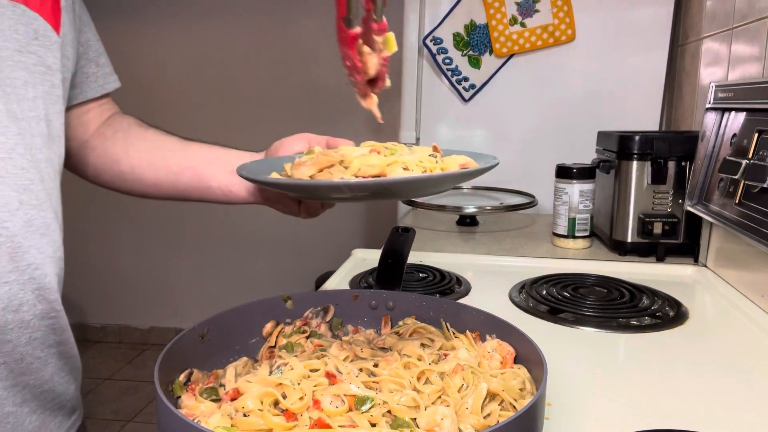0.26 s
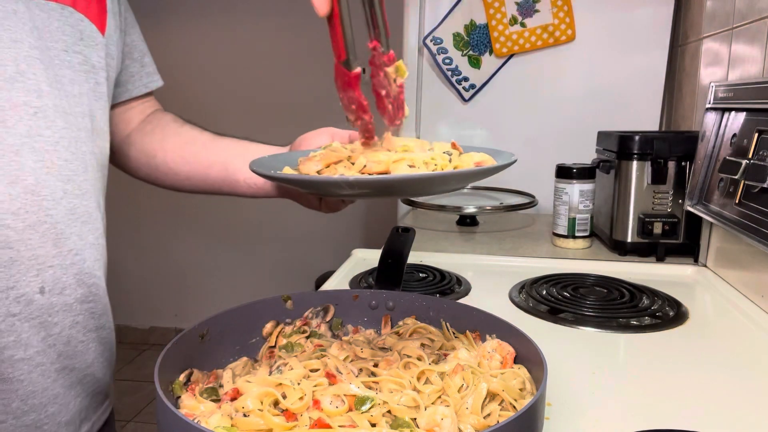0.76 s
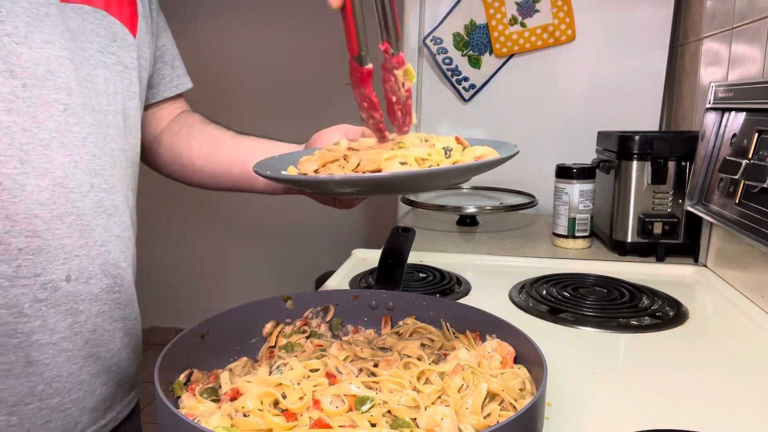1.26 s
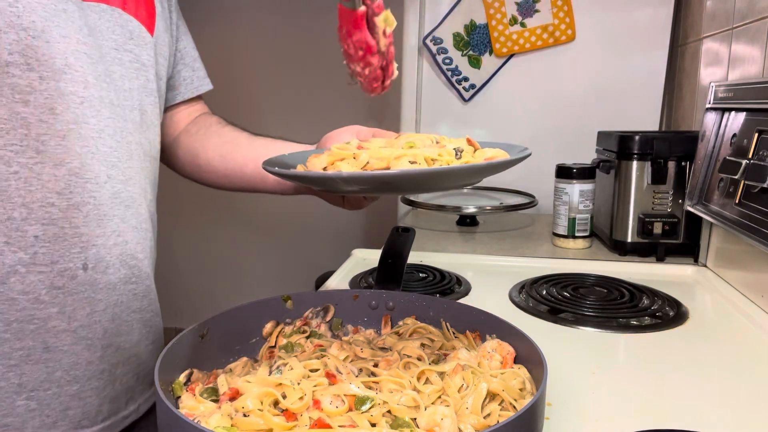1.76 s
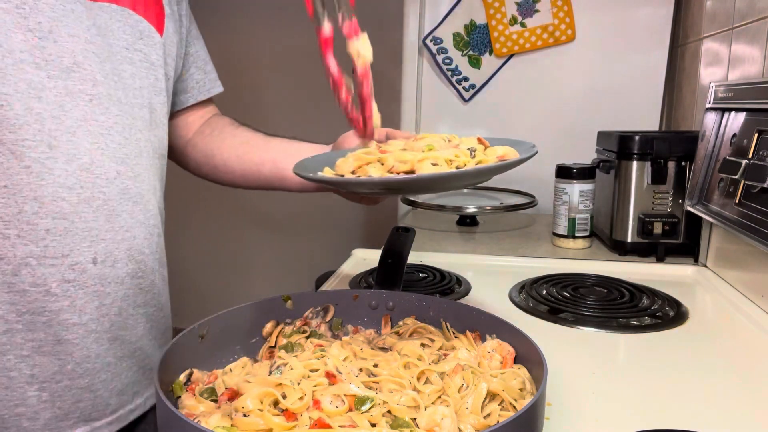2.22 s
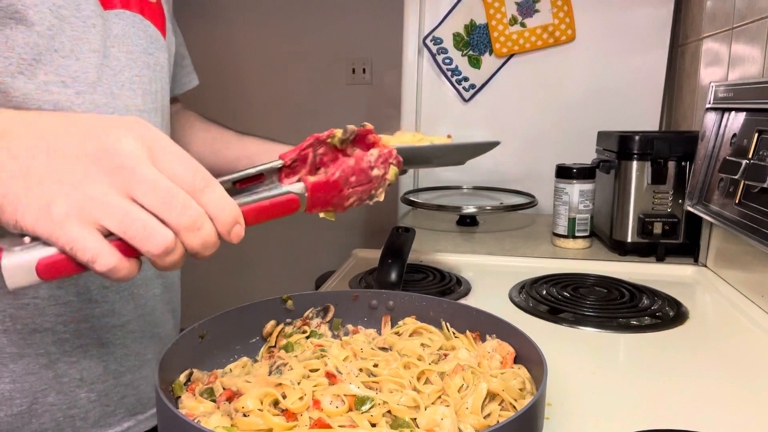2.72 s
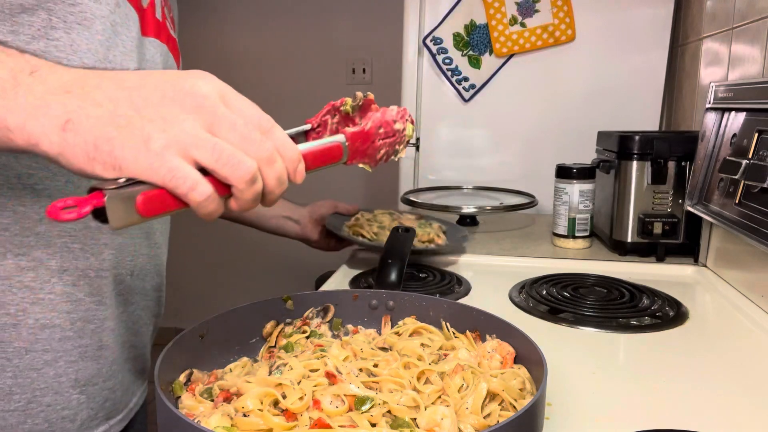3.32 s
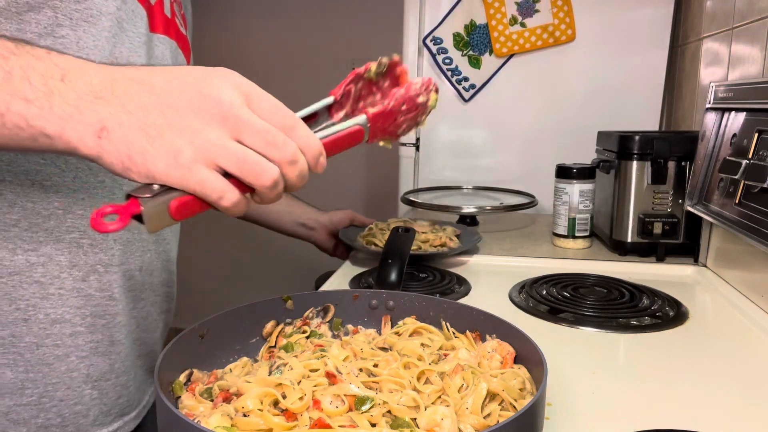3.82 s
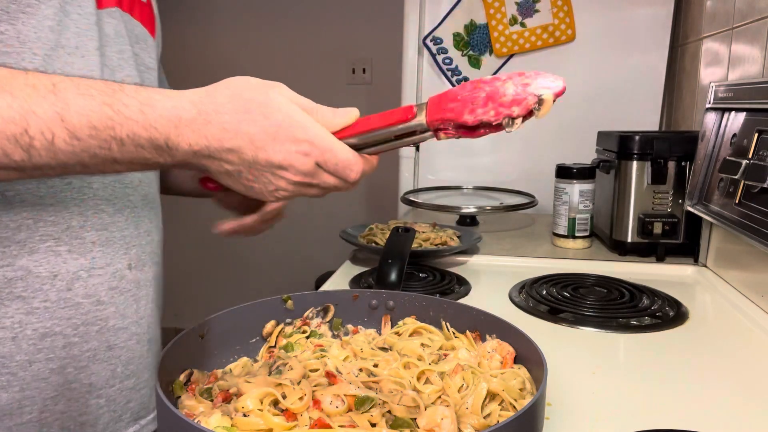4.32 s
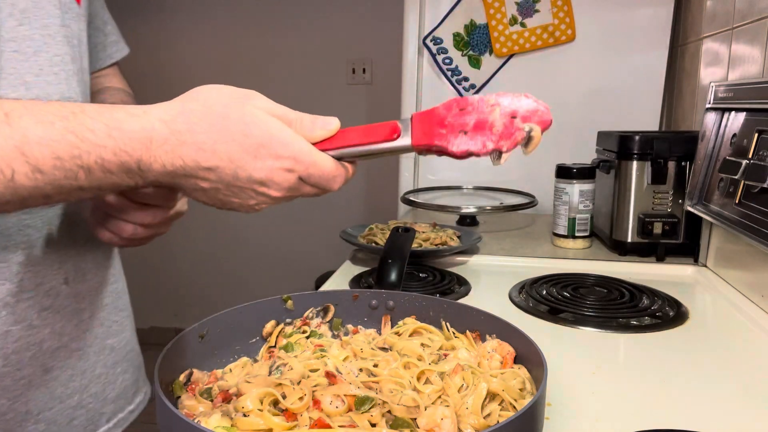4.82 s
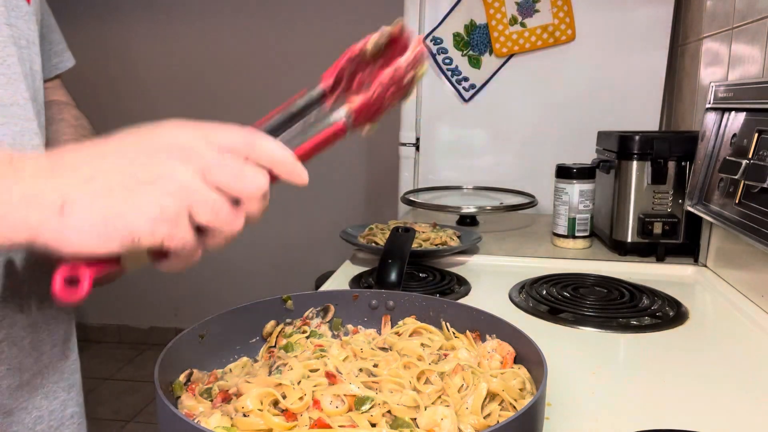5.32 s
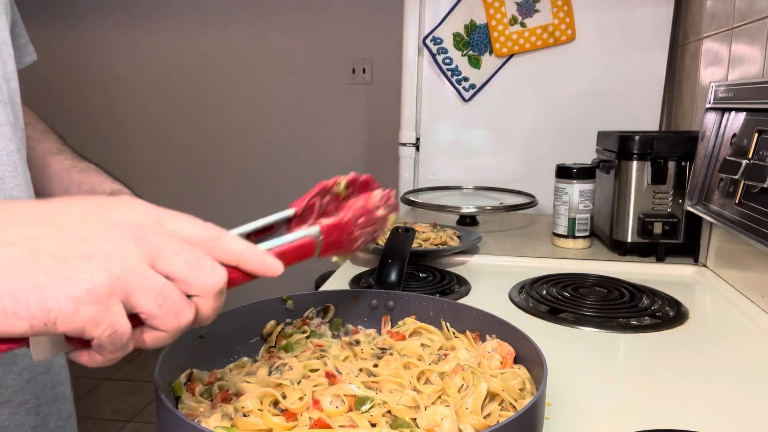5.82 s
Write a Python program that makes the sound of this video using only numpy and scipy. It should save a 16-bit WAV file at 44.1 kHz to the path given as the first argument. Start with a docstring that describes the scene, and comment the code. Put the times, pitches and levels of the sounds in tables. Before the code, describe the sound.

A quiet home kitchen with low, bass-heavy room tone and faint sauce pops. Tiny pasta ticks come first, then one crisp clack of steel tongs at two seconds. Past three seconds a full plate is set on the enamel stove top in three solid, rattling knocks, the loudest sounds here. Light tong clacks and thin, bright ticks continue to the end. Close stereo pickup in a small hard room.

```python
"""A quiet home kitchen. Low room tone (banded noise) runs throughout under faint sauce pops (short pings)
and small ticks of pasta and of tongs (bursts of a few cycles with a noisy snap). From two seconds in, steel
tongs clack lightly in the hand. Past three seconds a full plate is set down on the enamel stove top in
three knocks, rocking after the first and last. Short dull noise swells surround the onsets of the knocks
and first clack. Blows ring body modes and noise echoes of a small hard room; clacks and ticks carry on."""
import sys
import numpy as np
from scipy import signal
from scipy.fft import rfft, irfft
from scipy.io import wavfile

SR = 44100
rng = np.random.default_rng(int(sys.argv[2]) if len(sys.argv) > 2 else 0)


def generate_wav(signal):
    """Clip the signal to [-1, 1] and save it as 16-bit WAV at the path in sys.argv[1]."""
    frames = np.transpose(np.atleast_2d(signal))
    scaled = np.clip(frames, -1, 1) * 32767
    pcm = np.round(scaled).astype(np.int16)
    wavfile.write(sys.argv[1], SR, pcm)


N = 267687   # length [samples]


def amp(db):
    """Decibels to gain."""
    return 10 ** (np.asarray(db) / 20)


def rms_one(x):
    """Scale to unit RMS level."""
    return x / np.sqrt(np.mean(x ** 2) + 1e-20)


def at_hz(points, hz):
    """Read a curve of (frequency, value) points on a log-frequency axis."""
    curve_hz, values = np.array(points)[:, :2].T
    return np.interp(np.log(hz), np.log(curve_hz), values)


def train(times, sizes):
    """Clicks of the given sizes at the given times."""
    out = np.full(N, 1e-18)   # tiny offset keeps the filters away from denormal numbers
    np.add.at(out, (np.array(times) * SR).astype(int), sizes)
    return out


def drift(rate):
    """Slow random wandering of spread 1: noise through two equal low-passes at rate [Hz]."""
    step = 40   # computed once per 40 samples
    r = np.exp(-2 * np.pi * rate * step / SR)
    noise = rng.standard_normal(N // step + 2002)
    slow = signal.lfilter([1], [1, -2 * r, r * r], noise)[2000:]   # drop the run-in
    return np.interp(np.arange(N) / step, np.arange(len(slow)), rms_one(slow))


def ring(clicks, hz, t60):
    """Two-pole resonator: a unit click sets a sine of height 1 ringing, down 60 dB after t60 [s]."""
    r, w = amp(-60 / (t60 * SR)), 2 * np.pi * hz / SR
    return signal.lfilter([0, np.sin(w)], [1, -2 * r * np.cos(w), r * r], clicks)


EDGES = 22 * 2 ** np.arange(0, 9.8, .45)   # band edges [Hz], 0.45 octave apart


def bands():
    """Each band of the filter bank: its centre [Hz] and its band-pass."""
    for low, high in zip(EDGES, EDGES[1:]):
        yield np.sqrt(low * high), signal.butter(2, [low, high], "band", fs=SR, output="sos")


# spectrum of the room tone's mid: (frequency [Hz], relative level per Hz [dB])
TONE_MID_SPECTRUM = [(20, -20), (36, -4), (60, 0), (130, -6.5), (205, -12.5), (255, -20), (440, -13.5),
                     (560, -22), (720, -17.5), (985, -27.5), (2500, -30.5), (5200, -34), (9000, -37),
                     (16000, -36.5)]
# stereo width of the room tone: (frequency [Hz], side minus mid [dB])
TONE_WIDTH = [(60, -16.5), (150, -9.5), (380, -3.5), (950, -5), (2380, -5), (5980, -2.5), (15000, 9)]
# swells of the treble hiss: (time [s], level relative to the room tone [dB])
HISS_SWELLS = [(0.0, 1), (.51, 3), (.64, 8.5), (.85, 3.5), (1.23, 7), (1.35, 3), (1.47, 6.5), (1.64, 1.5),
               (2.08, 3.5), (2.209, -3.5), (2.41, 2.5), (3.291, 1.5), (4.44, 4), (5.339, 6.5), (6.06, 5.5)]
TONE_DB, RUMBLE_WANDER_DB = -36, .5


def room_tone(patchy_db):
    """Mid and side noise shaped band by band; bass rumble and treble hiss swell on their own."""
    swell_s, swell_db = np.transpose(HISS_SWELLS)
    white, out = rng.standard_normal((2, 2, N)), np.zeros((2, N))
    together = drift(30)   # flutter shared by the upper bands
    rumble_db = RUMBLE_WANDER_DB * drift(3.0)
    hiss_db = np.interp(np.arange(N) / SR, swell_s, swell_db)
    for k, (hz, sos) in enumerate(bands()):
        high = np.clip(np.log2(hz / 250) / 5.5, 0, 1)   # 0 = all rumble, 1 = all hiss
        swells_db = (1 - high) * rumble_db + high * hiss_db
        flutter_db = patchy_db * (high * together + 2.4 * drift(17))
        gain = amp(TONE_DB + at_hz(TONE_MID_SPECTRUM, hz) + swells_db + flutter_db)
        width = amp([[0], [at_hz(TONE_WIDTH, min(hz, 6000))]])
        out += gain * width * signal.sosfilt(sos, white[k % 2])
    return out


def crackle(per_s, level_db):
    """Faint sauce pops: random clicks in clumps, each pinging one of 8 pitches from its own direction."""
    born = rng.random(N) < per_s * amp(4.0 * drift(12)) / SR
    strength = amp(2.7 * np.minimum(rng.exponential(1, N), 3))
    pops = strength * born * (2 * rng.random((2, N)) - 1)   # random shares of mid and side
    pitches, dealt = np.geomspace(1500, 13000, 8), rng.integers(0, 8, N)
    out = np.zeros((2, N))
    for k, hz in enumerate(pitches):
        out += ring(pops * (dealt == k) + 1e-18, hz, 21.0 / hz)
    return amp(level_db) * out


# small ticks, of pasta and of the tongs: (time [s], level [dB], centre frequency [Hz],
# left minus right [dB], broad snap relative to the tick [dB])
SMALL_TICKS = [(0.0997, -50.5, 5240, -10, -19), (0.3059, -45.5, 5600, -12, -8),
               (0.447, -50.5, 2800, -6, 6.5), (0.745, -44.5, 5200, -9, -23), (0.8739, -45, 5240, -14, -14),
               (0.926, -39, 6340, -6, -18), (1.2266, -47, 2700, -6, 0), (1.4, -46, 5950, -14, -15),
               (1.455, -48, 6200, 8, 5), (1.854, -38, 12900, 4, -16), (2.43, -60.5, 4170, -10, 12.5),
               (2.479, -54, 3000, -5, 3), (2.52, -45.5, 5200, -10, -13), (2.943, -51, 4300, -10, -2),
               (3.288, -43, 5600, 1, -11), (3.819, -42, 5830, -8, -6), (4.325, -45.5, 3600, -2.5, -10),
               (4.355, -49, 4930, -10, 3), (4.6509, -47, 4960, -14, 2), (4.6544, -35, 2500, -17, -9),
               (4.766, -43, 5170, -3, -22), (4.797, -47, 5330, -12, -19), (5.1907, -35, 6020, -2, -8),
               (5.2607, -44, 5600, 1.5, -11), (5.2759, -36, 11300, -11, -23),
               (5.436, -23, 12500, -8.5, -19), (5.474, -30.5, 12000, 4, -11),
               (5.5236, -30.5, 12460, -8, -15), (5.5456, -50, 2400, -7.5, -18.5)]
SNAP_T60_S = .005


def ticks(cycles, tail_db, tail_s):
    """Each tick rings for a few cycles with a broad snap on top and a short grainy tail at its pitch."""
    out, t = np.zeros((2, N)), np.arange(SR // 16) / SR
    for s, level_db, hz, pan_db, snap_db in SMALL_TICKS:
        grain, phase = rng.standard_normal((2, 2, len(t))), t * hz / cycles
        snap_noise = amp(snap_db - 60 * t / SNAP_T60_S) * grain[0]
        snap = np.diff(snap_noise, prepend=0)   # differencing brightens the noise
        tail = ring(grain[1] * amp(-60 * t / tail_s), hz, 5.8 / hz)
        tail = amp(tail_db) * tail * np.sqrt(hz / SR)
        ping = np.sin(2 * np.pi * hz * t) * (1 - np.exp(-15 * phase)) * amp(-50 * phase)
        pan = np.array([[.5], [-.5]]) * pan_db
        out[:, round(s * SR):][:, :len(t)] += amp(level_db + pan) * (ping + snap + tail)
    left, right = out
    return np.array([left + right, left - right]) / 2


# dull noise swells around the onsets of the knocks and first clack: (start [s], end [s], final level [dB])
ONSET_SWELLS = [(2.079, 2.092, -58), (3.339, 3.358, -35.5), (3.653, 3.665, -34), (3.85, 3.868, -31)]
SWELL_RISE_DB, SWELL_HZ, SWELL_T60_S = 12, 2080, 0.0044


def onset_noise():
    """Noise through one heavily damped resonance near 2 kHz, rising through each swell, then cut off."""
    t, shape = np.arange(N) / SR, np.zeros(N)
    for start, end, level_db in ONSET_SWELLS:
        to_go = (end - t).clip(0, 1) / (end - start)
        shape += amp(level_db - SWELL_RISE_DB * to_go) * (t > start) * (t < end)
    return shape * rms_one(ring(rng.standard_normal((2, N)), SWELL_HZ, SWELL_T60_S))


BOOM_OCTAVES = 0.84   # half-width of the boom, to 1/e of its dB


def colour(body, hz):
    """Size of every blow at one frequency: body spectrum, a boom band, and brightness about a pivot."""
    rows, spectrum, boom_hz, pivot_hz, tilt_from_hz = body
    _, level_db, boom_db, slope_db, *_ = np.transpose(rows)
    boom = np.exp(-(np.log2(hz / boom_hz) / BOOM_OCTAVES) ** 2)
    octaves = min(np.log2(max(hz, tilt_from_hz) / pivot_hz), 3.0)   # the tilt goes flat at both ends
    return amp(at_hz(spectrum, hz) + level_db + boom_db * boom + slope_db * octaves)


# how long the room rings: (frequency [Hz], decay by 60 dB [s])
ROOM_DECAY = [(60, 0.98), (95, 0.32), (160, 0.97), (420, 0.68), (1100, 0.43), (2900, 0.41), (7700, 0.4),
              (14000, 0.44)]
# stereo width of the echoes: (frequency [Hz], side minus mid [dB])
ROOM_WIDTH = [(60, -15), (150, -12), (380, -2.5), (950, 0.5), (2380, -2), (5980, -2), (15000, -4.5)]


def room_answer(body, rattle_db, rattle_s, echo_db, build_s, build_cycles):
    """A short rattle and dense echoes: noise that builds up and dies band by band after every blow."""
    times, out = [row[0] for row in body[0]], np.zeros((2, N))
    white = rng.standard_normal((2, 2, N))
    for k, (hz, sos) in enumerate(bands()):
        clicks = train(times, colour(body, hz)) / np.sqrt(hz / SR)   # levels are per band, not per Hz
        echo_decay, rattle_decay = amp(-60 / (at_hz(ROOM_DECAY, hz) * SR)), amp(-60 / (rattle_s * SR))
        echoes = signal.lfilter([amp(echo_db)], [1, -echo_decay], clicks)
        rattle = signal.lfilter([amp(rattle_db)], [1, -rattle_decay], clicks)
        build = np.exp(-1 / ((build_s + build_cycles / hz) * SR))   # lows take longer to fill the room
        shape = signal.lfilter([1 - build], [1, -build], echoes + rattle)
        out += signal.sosfilt(sos, amp([[0], [at_hz(ROOM_WIDTH, hz)]]) * shape * white[k % 2])
    return out


def struck_modes(body, modes, spots, ring_db, swell_cycles):
    """Each natural mode swells over some cycles, then dies away, as loud as the struck spot drives it."""
    times, out = [row[0] for row in body[0]], np.zeros((2, N))
    for k, (hz, t60, *spot_db) in enumerate(modes):
        chance_db = rng.normal(0, 1.0, len(times))
        sizes = colour(body, hz) * amp(np.take(spot_db, spots) + ring_db + chance_db)
        swell = ring(train(times, sizes), hz, swell_cycles / hz)
        swell = np.diff(swell, prepend=0) / (2 * np.pi)
        side = amp(at_hz(ROOM_WIDTH, hz) - 2.0) * (-1) ** k   # neighbouring modes lean opposite ways
        out += ring(swell, hz, t60) * [[1], [side]]
    return out


CRACK_DELAY_S = .0007


def bursts(rows, parts, crack_cycles):
    """Every blow's crack at its own pitch, then the bursts that all blows on this body share."""
    out = []
    for s, level_db, _, brightness, crack_hz, crack_db in rows:
        out.append((s + CRACK_DELAY_S, crack_db, crack_hz, crack_cycles))
        for delay_s, hz, cycles, part_db, gain_db in parts:
            out.append((s + delay_s, level_db + part_db + gain_db * brightness, hz, cycles))
    return out


# first wall echoes: (delay [s], level [dB], share of the width, sign gives the side)
WALL_ECHOES = [(.0055, -14.5, 0.83), (0.01, -17.5, -0.79), (0.0163, -14.5, 0.91), (0.0209, -13.5, -1),
               (0.028, -20, 1)]


def contacts(rows, width):
    """Each contact is a burst of a few cycles; the nearest walls send it back from either side."""
    direct, t = np.zeros(N), np.arange(SR // 20) / SR
    for s, level_db, hz, cycles in rows:
        phase = hz * t / cycles   # 58 dB down when this reaches 1
        envelope = (1 - np.exp(-12 * phase)) * amp(level_db - 58 * phase)
        direct[round(s * SR):][:len(t)] += np.sin(2 * np.pi * hz * t) * envelope
    out = direct * np.array([[1], [0]])
    for lag_s, level_db, side in WALL_ECHOES:
        out += amp(level_db) * np.roll(direct, round(lag_s * SR)) * [[1], [width * side]]
    return out


def thin(x, hz):
    """Small bodies radiate no deep bass: high-pass."""
    return signal.sosfilt(signal.butter(3, hz, "high", fs=SR, output="sos"), x)


def lean(x, right):
    """A source off to the right puts some of its mid, inverted, into the side."""
    mid, side = x
    return np.array([mid, side - right * mid])


# tong arms meeting: (time [s], level [dB], boom [dB], brightness [dB per octave],
# crack frequency [Hz], crack level [dB])
CLACK_BLOWS = [(2.089, -20, -12, -1.5, 2620, -15.5), (2.1028, -33, -30, -14, 2800, -26),
               (4.2175, -29, -9, -38, 2470, -38), (4.5178, -36, -4.5, 0, 2720, -37.5),
               (4.6583, -26.5, 3, 5, 2700, -20), (4.6635, -34, -4, -4, 2250, -24),
               (5.0046, -43, -2, -0.5, 2820, -35)]
# which of the two places along the arms meets, one per clack: (column of place levels)
CLACK_PLACES = [0, 0, 0, 0, 1, 1, 0]
# spectrum of a clack: (frequency [Hz], relative level [dB])
CLACK_SPECTRUM = [(170, -46), (300, -52), (600, -15), (1300, -14.5), (2600, -10.5), (5500, -17.5),
                  (12000, -16.5)]
# bursts in every contact of the arms: (delay [s], frequency [Hz], cycles to fall 58 dB,
# level relative to the clack [dB], gain per unit of brightness [dB])
CLACK_BURSTS = [(0.00073, 11300, 4.1, -1.5, 3.5), (0.00159, 1260, 3.2, -18.5, 3.4),
                (0.0004, 1740, 6.8, -5, 0.12)]
# modes of the steel arms: (frequency [Hz], decay by 60 dB [s], then relative level at each place [dB])
TONG_MODES = [(690, 0.12, 3, -5), (1006, 0.13, -16, 2), (1045, 0.21, -16, 11), (1198, 0.12, -5, 5),
              (1810, 0.066, 1.5, -11), (1993, 0.072, 7.5, 13), (2250, 0.2, -4, 9), (2700, 0.16, 1, 0),
              (2860, 0.17, 0, 4.5), (3040, 0.22, -10, -7), (3343, 0.2, -3.5, -8), (4700, 0.17, -8, -16),
              (4760, 0.08, -8, -18), (5600, 0.11, 0.5, -16)]
CLACK_BOOM_HZ, CLACK_PIVOT_HZ, CLACK_TILT_FROM_HZ = 1190, 3070, 3060
CLACK_CRACK_CYCLES, TONGS_RIGHT = 4.2, 0.035   # TONGS_RIGHT: share of the mid leaning right


def tongs():
    """Steel arms meet: crisp contact bursts, ringing arm modes and the room's answer."""
    arms = CLACK_BLOWS, CLACK_SPECTRUM, CLACK_BOOM_HZ, CLACK_PIVOT_HZ, CLACK_TILT_FROM_HZ
    body = room_answer(arms, rattle_db=-11.5, rattle_s=0.033, echo_db=-23.5, build_s=0.00024, build_cycles=4.9)
    body += struck_modes(arms, TONG_MODES, CLACK_PLACES, ring_db=3.5, swell_cycles=0.89)
    contact = contacts(bursts(CLACK_BLOWS, CLACK_BURSTS, CLACK_CRACK_CYCLES), width=0.2)
    return lean(thin(thin(body, hz=654) + contact, hz=600), TONGS_RIGHT)


# broad resonances of the plate: (frequency [Hz], width [Hz], level [dB])
PLATE_RESONANCES = [(460, 47, -2), (1100, 430, -0.5), (2320, 120, 1.5), (3670, 23, 8), (5284, 300, 0.5)]


def resonant(x):
    """The plate lifts a few broad bands out of whatever shakes it: band-passes added to the source."""
    out = x.copy()
    for hz, width_hz, level_db in PLATE_RESONANCES:
        r = np.exp(-np.pi * width_hz / SR)
        zeros = np.array([1, 0, -1]) * (1 - r * r) / 2
        poles = [1, -2 * r * np.cos(2 * np.pi * hz / SR), r * r]
        out += amp(level_db) * signal.lfilter(zeros, poles, x)
    return out


# plate on the stove top: (time [s], level [dB], boom [dB], brightness [dB per octave],
# crack frequency [Hz], crack level [dB])
KNOCK_BLOWS = [(3.3566, -8, 6, 0.035, 2230, -3), (3.3715, -19, 10.5, -3.5, 870, -9),
               (3.380, -14.5, 6.5, -1, 1100, -12), (3.3875, -25.5, 7.5, 0, 600, -21),
               (3.397, -20, 6.5, -2, 1140, -22), (3.6622, -7.5, 6.5, -1, 1280, -1),
               (3.856, -4.5, 19.5, -5.5, 1005, -10), (3.8775, -21.5, 3, -1, 385, -11.5)]
# which of three spots of the stove top each knock lands on: (column of spot levels)
KNOCK_PLACES = [0, 0, 0, 0, 0, 1, 2, 2]
# the sheet top flexes under the plate in dull thumps: (time [s], frequency [Hz], level [dB])
SHEET_THUMPS = [(3.358, 500, -6.5), (3.385, 480, -10.5), (3.6637, 540, -10), (3.8578, 600, -1.5),
                (3.867, 470, -5.5), (3.8769, 439, -6.5), (3.9098, 420, -12)]
# spectrum of a knock: (frequency [Hz], relative level [dB])
KNOCK_SPECTRUM = [(45, -42.5), (90, -25.5), (170, -21), (300, -18.5), (600, -10), (1300, -10),
                  (2600, -13.5), (5500, -19.5), (12000, -19)]
# further bursts in the plate's contact: (delay [s], frequency [Hz], cycles to fall 58 dB,
# level relative to the knock [dB], gain per unit of brightness [dB])
KNOCK_BURSTS = [(.0004, 5600, 19, -1, 24.5), (.0004, 8040, 22, -20, -1.3), (.0007, 10500, 12, -6.5, 0.5)]
# modes of sheet top and plate: (frequency [Hz], decay by 60 dB [s], then relative level at each spot [dB])
STOVE_MODES = [(89.3, 0.2, -16, -25, -10), (122, 0.093, -22.5, -19.5, -7), (164.3, .4, 0, 1, -4.5),
               (307.8, 0.35, -5.5, -4, 4.5), (322.7, 0.25, -4.5, -4.5, 8), (381.6, 0.16, 0.5, 1, 5),
               (415.5, 0.27, -15, -7.5, 2), (438.5, 0.18, -16.5, -7, 5), (458, 0.38, -10.5, -11, -14.5),
               (497, 0.48, -6, -12, -9.5), (605, 0.1, -6.5, -9, 4), (705, 0.14, -9.5, -19, -17.5),
               (714, .15, -18.5, -16, 0), (826, 0.24, -14.5, -15.5, -13.5), (856, 0.14, -12, -0.5, -17),
               (991, 0.16, -5.5, -11, -7), (1100, .3, -21, -17.5, -18.5), (1155, 0.1, -16.5, -19.5, -18.5),
               (1253.4, .12, -6, -11.5, -17), (1384.5, .2, -14.5, -11, -7), (1450, .2, -9, -16, -22.5),
               (1697, .2, -25.5, -23.5, -13.5), (1785, 0.16, -30, -11, -16), (2190, .27, -6, -20.5, -17),
               (2283, 0.21, -8, -21.5, -11), (2670, 0.36, -13.5, -21, -27),
               (2970, .25, -14.5, -10.5, -24.5), (3398, 0.086, -20, -14, -19.5), (3700, 0.3, -13, -13, -19),
               (4000, 0.21, -9, -23.5, -21), (4837, 0.13, -7, -16, -21.5), (5440, 0.16, -12.5, -11.5, -17),
               (7420, .13, -1, -13, -9.5)]
KNOCK_BOOM_HZ, KNOCK_PIVOT_HZ, KNOCK_TILT_FROM_HZ = 94.9, 730, 930
KNOCK_CRACK_CYCLES, THUMP_CYCLES, PLATE_RIGHT = 13, 8.5, .08   # PLATE_RIGHT: share of the mid leaning right


def plate():
    """The plate strikes enamelled sheet: cracks and thumps, ringing modes and the room's answer."""
    dish = KNOCK_BLOWS, KNOCK_SPECTRUM, KNOCK_BOOM_HZ, KNOCK_PIVOT_HZ, KNOCK_TILT_FROM_HZ
    body = room_answer(dish, rattle_db=-12.0, rattle_s=0.071, echo_db=-19.5, build_s=0.00096, build_cycles=0.22)
    body += struck_modes(dish, STOVE_MODES, KNOCK_PLACES, ring_db=-0.5, swell_cycles=10.5)
    thumps = [(s, level_db, hz, THUMP_CYCLES) for s, hz, level_db in SHEET_THUMPS]
    contact = contacts(bursts(KNOCK_BLOWS, KNOCK_BURSTS, KNOCK_CRACK_CYCLES) + thumps, width=0.17)
    return lean(resonant(body) + thin(contact, hz=289), PLATE_RIGHT)


def scene():
    """Mid and side of all sources, turned to left and right."""
    background = room_tone(patchy_db=1.1) + crackle(per_s=130, level_db=-63.0)
    small = ticks(cycles=12.0, tail_db=-24, tail_s=.04)
    mid, side = background + small + onset_noise() + tongs() + plate()
    return np.array([mid + side, mid - side])


# fixed equalisation of the mid, with a deep dip near 8 kHz: (frequency [Hz], level [dB])
MID_EQ = [(6000, 2), (7200, -2.5), (7800, -18), (8600, -16), (9400, -6), (13300, -3.5), (14200, -27),
          (16500, -36)]
# fixed equalisation of the side, with a deep dip near 12 kHz: (frequency [Hz], level [dB])
SIDE_EQ = [(6000, 3.5), (9500, 0.5), (10800, -23.5), (12800, -31.5), (14000, 2), (15800, -11.5),
           (16500, -31)]
LEFT_DB, LEFT_LAG_S, LAG_FADE_HZ, CUTOFF_HZ = -2.5, .00009, 5000, 16651   # left against right; top cut


def record(dry):
    """The left is quieter and, in the bass, later; mid and side are equalised apart and the top is cut."""
    hz = np.maximum(np.fft.rfftfreq(N, 1 / SR), 1)
    lag_s = LEFT_LAG_S * np.exp(-hz / LAG_FADE_HZ)   # the lag fades toward the treble
    left, right = rfft(dry[0]) * np.exp(-2j * np.pi * hz * lag_s), rfft(dry[1])
    mid = irfft((left + right) * amp(at_hz(MID_EQ, hz)), N) / 2
    side = irfft((left - right) * amp(at_hz(SIDE_EQ, hz)), N) / 2
    pair = np.array([mid + side, mid - side]) * amp([[LEFT_DB / 2], [-LEFT_DB / 2]])
    return signal.sosfilt(signal.cheby2(12, 70, CUTOFF_HZ, fs=SR, output="sos"), pair)


dry = scene()
out = record(dry)
generate_wav(out)
```